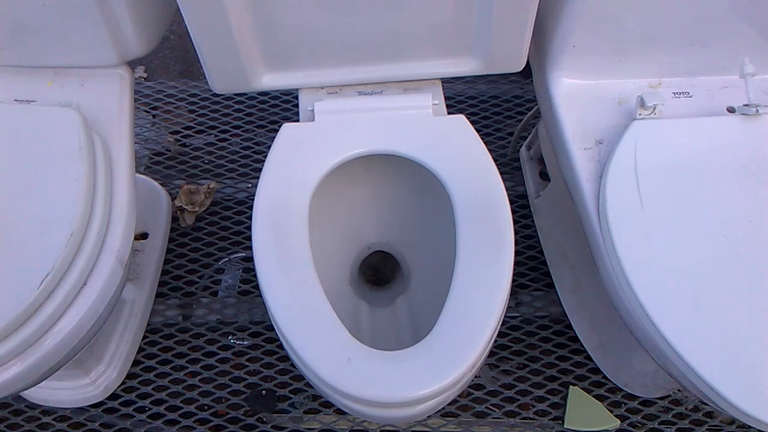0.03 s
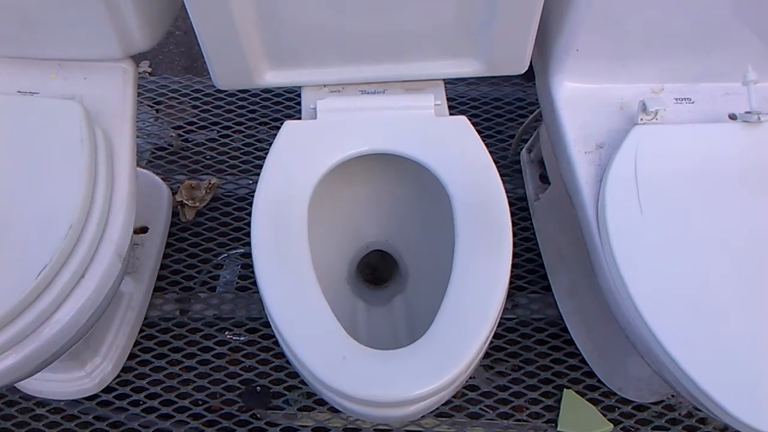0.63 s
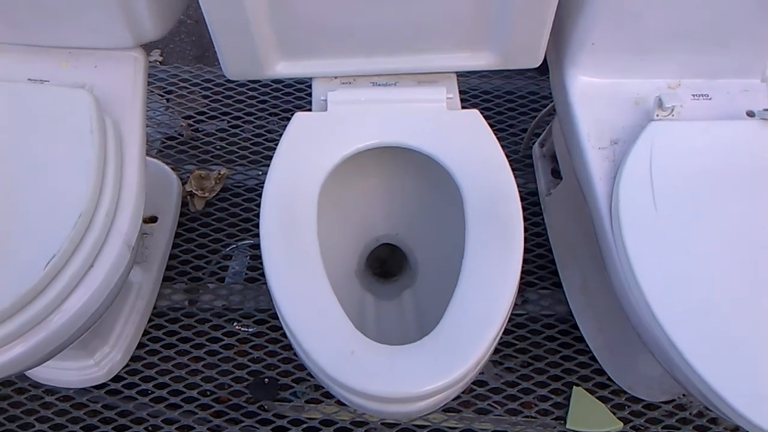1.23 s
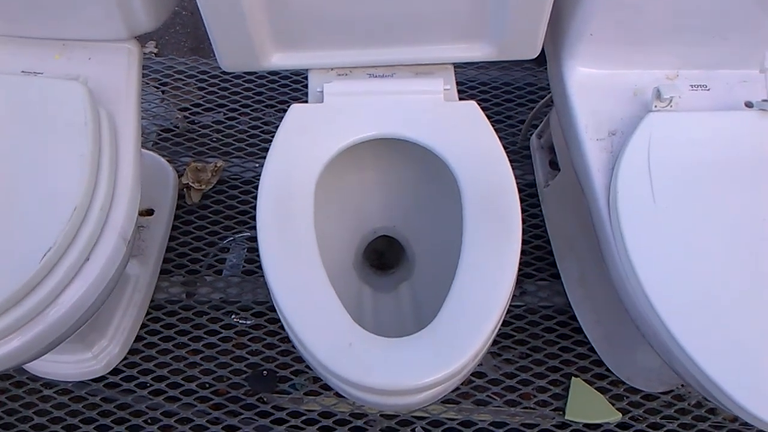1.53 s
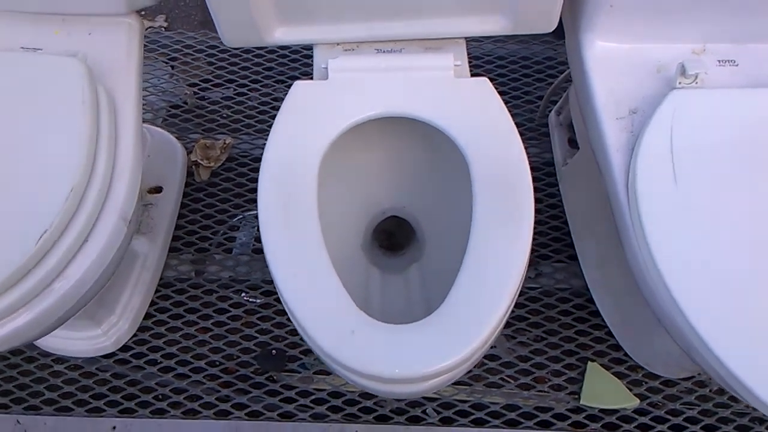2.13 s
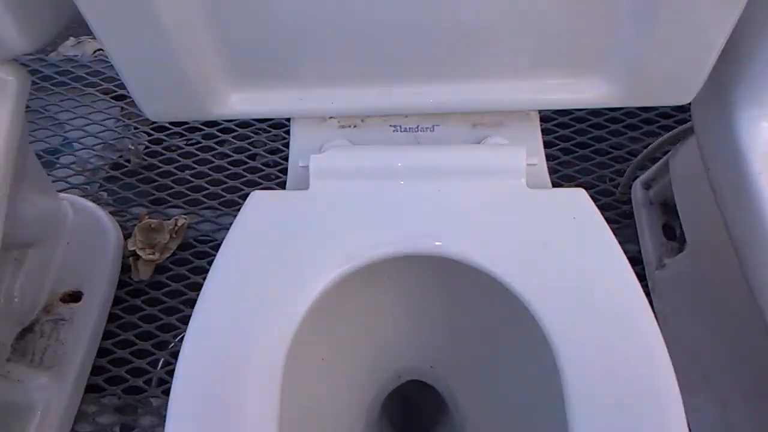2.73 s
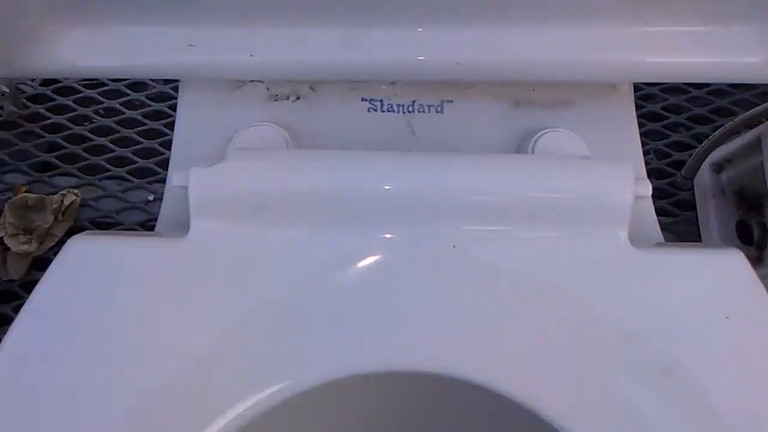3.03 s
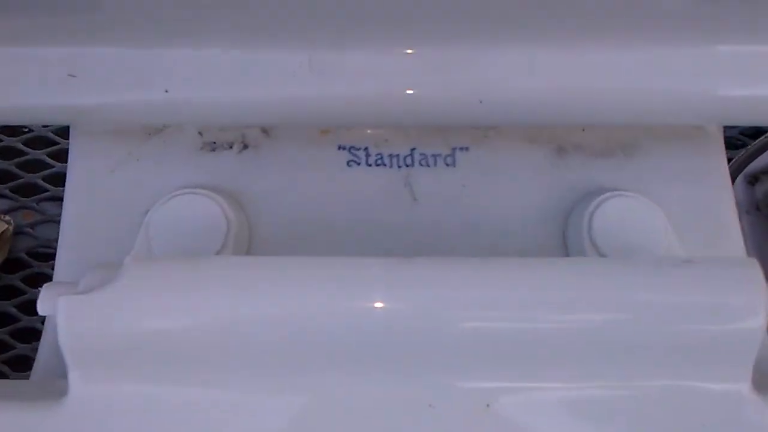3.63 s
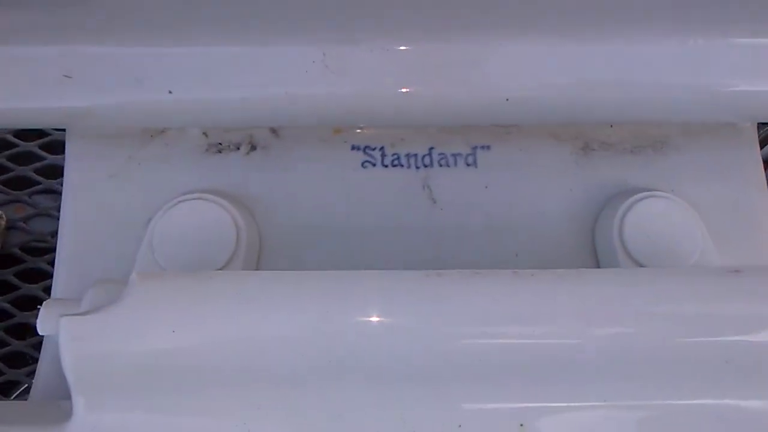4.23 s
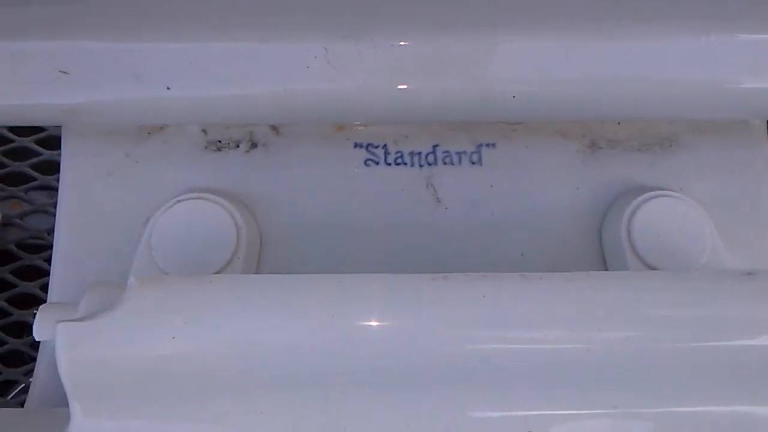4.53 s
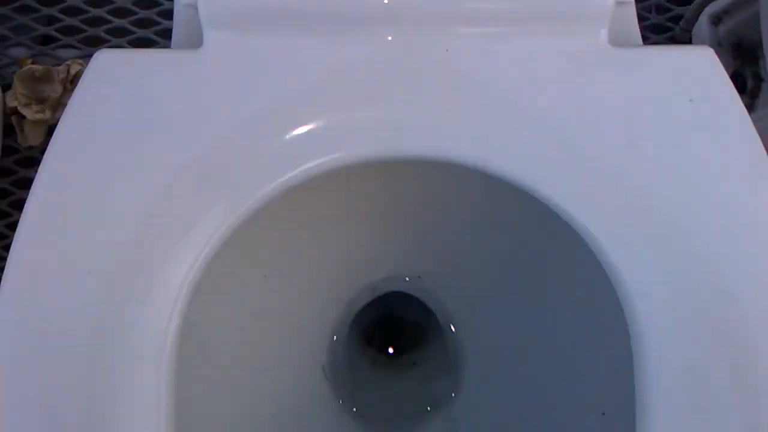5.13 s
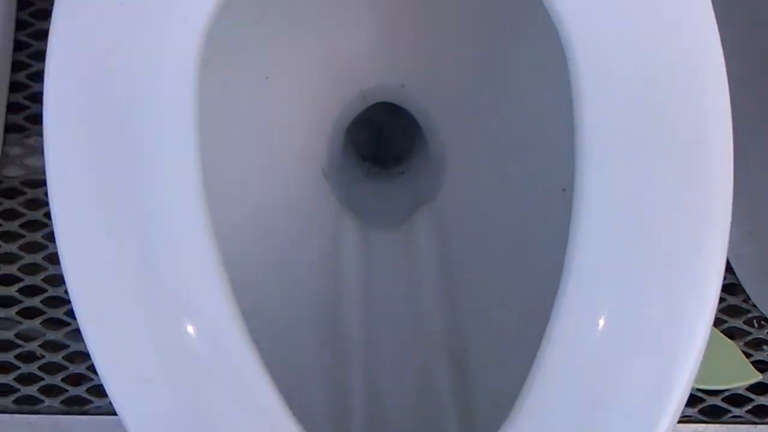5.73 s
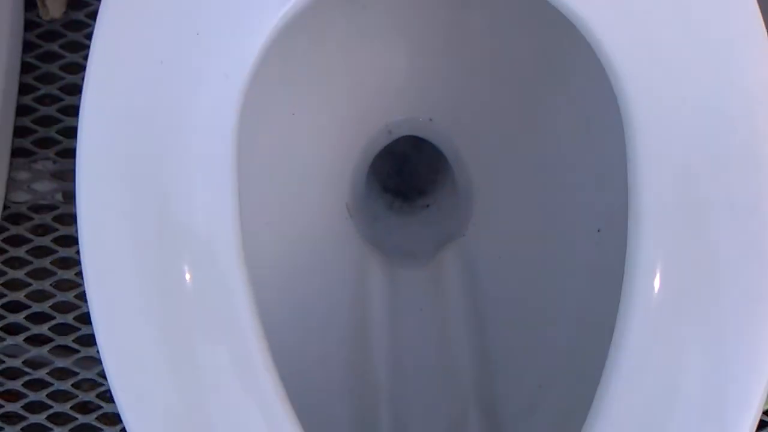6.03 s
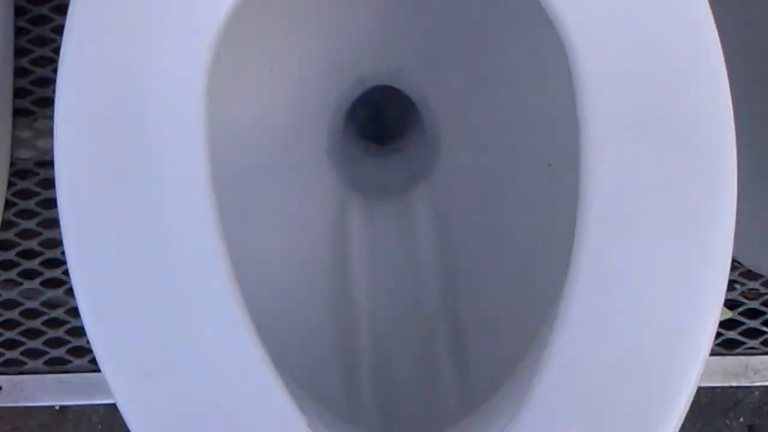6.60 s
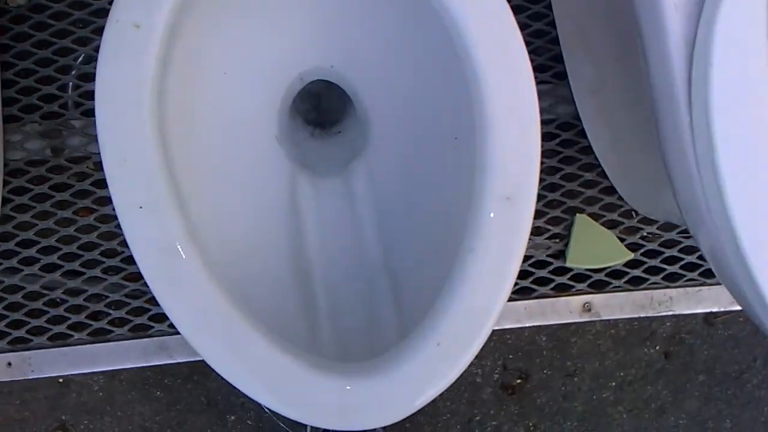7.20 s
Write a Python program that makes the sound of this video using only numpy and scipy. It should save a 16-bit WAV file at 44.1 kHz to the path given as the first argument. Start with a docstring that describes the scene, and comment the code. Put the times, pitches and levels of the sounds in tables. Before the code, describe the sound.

Outdoors in a salvage yard, a distant engine drones over low rumble and steady hiss. A heavy, hollow knock lands close by, then a small clink as the engine drops away. A short scrape and a few dry clacks follow. Fingers rub and bump the hand-held microphone, the air turns slightly hollow near a toilet bowl, and a light gust buffets the left side.

```python
"""A distant engine drones over low rumble and steady hiss, then drops away. Close by come a heavy,
hollow knock, a clink, a scrape and a few dry clacks, each a contact ringing short resonances.
A hand-held camera moves over a row of toilets in an outdoor salvage yard: the bowl and the hollow
between tank and seat colour the air as it nears the porcelain. Fingers rub and bump the housing,
one briefly seals the right microphone port, and a gust buffets the left."""
import sys
import numpy as np
from scipy import signal
from scipy.fft import rfft, irfft
from scipy.io import wavfile
from scipy.ndimage import uniform_filter1d

SR = 44100
rng = np.random.default_rng(int(sys.argv[2]) if len(sys.argv) > 2 else 0)


def master_out(mix):
    """Clip the mix to full scale and print it as 16-bit PCM to the path in sys.argv[1]."""
    frames = np.transpose(np.atleast_2d(mix))
    ceiling = np.clip(frames, -1, 1)
    pcm = np.round(ceiling * 32767).astype(np.int16)
    wavfile.write(sys.argv[1], SR, pcm)


N = 320166
TIME = np.arange(N) / SR
PORT_LAG_S = .00036  # direct sound reaches the right port this much later
CAVITY_DB_PER_HALVING = 10.5  # cavities grow with each halving of the distance from 1 m

# the camera's path: (time [s], distance to the bowl [m], distance to the hollow [m])
CAMERA_PATH = [(2.4, 0.52, 0.49), (3.2, 0.47, 0.22), (4.95, 0.5, 0.17), (5.25, 0.42, 0.27),
               (5.45, 0.29, 0.6), (6.6, 0.34, 0.78), (7.15, 0.46, 0.33)]
# dull spectrum of fingers or wind on the housing: (frequency [Hz], level [dB])
HOUSING_COLOUR = [(25, -46), (38, -7), (52, 3.5), (90, 10.5), (160, -2.5), (300, -14), (600, -29),
                  (1200, -43), (3000, -57)]


def clacks(grain_db=2.5, tail_db=-7.5, tail_t60=0.37, tail_db_per_octave=-4.5):
    """Each contact is a crowd of tiny slips ringing one resonance; nearby surfaces add a dull tail."""
    # knocks, clacks and soft rubs: (time [s], level [dB], rise [s], t60 [s], tilt [dB/octave],
    # ring [Hz], ring width [Hz], ring level [dB], left minus right [dB])
    contacts = [ (1.185, -36, .0015, 0.062, -0.5, 2500, 400, -4.5, 4),
                (1.521, -15.5, 0.011, 0.048, -4.5, 1930, 900, 1, -1.5),
                (1.535, -12, 0.0035, 0.086, 2.5, 1800, 700, -8, 3.5),
                (1.537, -13.5, 0.0034, 0.041, -6, 1070, 400, -4, 1),
                (1.551, -28, 0.002, 0.11, -4, 800, 400, 10, 4),
                (1.545, -19.5, 0.003, 0.14, -6, 420, 250, 9, 1),
                (1.567, -20.5, 0.0018, 0.105, -4, 2780, 2000, -8.5, 3),
                (1.577, -24.5, 0.0027, 0.21, -8.5, 370, 220, -5, -6),
                (1.641, -35, .003, 0.071, -12, 2010, 900, -2, 3),
                (1.976, -41, 0.0023, .12, 3, 10000, 1500, -6, 4),
                (1.9894, -31, 0.00055, 0.15, 2, 7800, 4040, -15, 4.5),
                (2.594, -39.5, 0.0021, 0.18, 8, 1800, 700, -11, -1.5),
                (2.76, -27, 0.0015, 0.056, -1, 1580, 341, 6, -12),
                (2.798, -17, 0.0046, 0.077, -1.7, 10900, 1500, -3, 2.5),
                (2.806, -24, 0.0011, 0.08, 0, 630, 220, 16, 2),
                (2.839, -16.5, 0.0064, 0.11, -1.6, 3400, 604, -12.5, 4),
                (2.99, -46.5, 0.11, .7, -2, 3500, 2000, -7, 7),
                (3.023, -26, 0.00043, 0.012, -3, 2840, 1410, -4.5, 14),
                (3.088, -30.5, 0.0032, 0.049, -2, 2880, 1500, 0, 3.5),
                (3.23, -18.5, .006, 0.075, -0.5, 4120, 2500, -8, 4),
                (3.38, -41.5, 0.0053, 0.065, 1, 4230, 700, -2, 7),
                (5.02, -49.5, 0.048, 0.26, -3, 2200, 400, -5, 4),
                (6.519, -37.5, 0.00096, 0.026, 8.5, 11150, 860, -3, 3),
                (6.57, -51, .035, .17, -7, 1050, 900, 4, 4),
                (6.84, -36, 0.00087, 0.053, -7.5, 700, 420, 5, 3), ]
    # the spectrum they share: (frequency [Hz], level [dB])
    contact_colour = [(100, -28), (330, 0.5), (700, 8.5), (1200, 2.5), (2900, 2), (3900, 3), (5300, 0.5),
                      (6800, 2.5), (8500, 4), (11500, 5.5), (14500, -6)]
    out, count = np.zeros((2, N)), 16384
    f, t = bins(count), TIME[:count]
    octaves = np.log2(np.maximum(f, 300) / 1000)
    for s, db, rise, t60, tilt_db, ring_hz, ring_width_hz, ring_db, pan_db in contacts:
        body = colour(contact_colour, f, 37) * undb(tilt_db * octaves)
        ring = np.abs(resonance(f, ring_hz, ring_width_hz)) ** 2.8
        gain = np.hypot(unit(body), undb(ring_db) * unit(ring))
        grain = uniform_filter1d(np.repeat(rng.standard_normal(count // 32), 32), size=32)
        slips = unit(undb(grain_db * grain))
        contact = field(gain, count, diffuse_hz=700, diffuse_top=0.14) * slips * swell(t, rise, t60)
        tail = field(gain * undb(tail_db_per_octave * octaves), count, diffuse_top=0.85)
        tail *= swell(t, rise, tail_t60)
        tail *= undb(tail_db) * np.sqrt(t60 / tail_t60)  # a longer contact scatters more
        clack = irfft(rfft(contact + tail) * glances(f, strength=0.43, longest_s=.003), count)
        add(out, s, clack * undb(db) * pan(pan_db))
    return out


def thuds(contact_s=.0015):
    """Heavy blows ring the low modes of a hollow body."""
    # the blows: (time [s], level [dB])
    blows = [(1.537, -23.5), (1.572, -21), (3.235, -37)]
    # the body's modes: (frequency [Hz], level [dB], t60 [s])
    modes = [(123.2, 4.5, 0.27), (254, 1.5, .3), (322, -3, 0.36), (382.4, -2.5, .25), (453, 0, 0.24),
             (518, -0.5, .22), (572, -3, 0.19), (668, -7, .17), (763, -5, .15)]
    out = np.zeros((2, N))
    t = np.maximum(TIME[:SR // 2] - np.array([[0], [PORT_LAG_S]]), 0)
    for s, db in blows:
        phases = rng.uniform(0, 2 * np.pi, len(modes))
        ring = sum(undb(mode_db) * np.sin(2 * np.pi * hz * t + phase) * swell(t, contact_s, t60)
                   for (hz, mode_db, t60), phase in zip(modes, phases))
        add(out, s, ring * undb(db))
    return out


def clinks(rise_s=0.00059):
    """Small hard parts touch and ring with one clean note."""
    # the touches: (time [s], level [dB], pitch [Hz], t60 [s], left minus right [dB])
    touches = [(1.977, -42.5, 6240, 0.062, 9), (1.99, -32.5, 2820, 0.1, 4)]
    out, t = np.zeros((2, N)), TIME[:SR // 4]
    for s, db, hz, t60, pan_db in touches:
        add(out, s, np.sin(2 * np.pi * hz * t) * swell(t, rise_s, t60) * undb(db) * pan(pan_db))
    return out


def scrape(start_s=2.7, rise_s=.065, glide_hz=(2352, 1800), slips=260, rasp_db=-31.5, hiss_db=-30.5):
    """Uneven slips each ring for a few cycles, lower as the pressure grows, over a thin hiss."""
    # friction hiss: (frequency [Hz], level [dB])
    friction_colour = [(500, 4), (1200, 2), (3200, 0), (4000, -4.5), (5200, -12), (7000, -5), (9000, 1.5),
                       (12000, 0), (14500, -10)]
    out, rings, count = np.zeros((2, N)), np.zeros((2, N)), 8192
    t, slip_t = TIME[:count], TIME[:512]
    slip_times = rng.random(slips) * t[-1]
    for s, (pitch, size, right_phase) in zip(slip_times, rng.standard_normal((slips, 3))):
        hz = np.interp(s, [0, rise_s], glide_hz) * np.exp(0.14 * pitch)
        ring = np.sin(2 * np.pi * hz * slip_t + np.array([[0], [right_phase]]))
        add(rings, s, ring * swell(slip_t, 1 / hz, t60=0.0097) * undb(4 * size))
    pressure = swell(t, rise_s, t60=.06)
    rasp = unit(rings[:, :count]) * undb(rasp_db) * pressure ** 1.5
    friction = field(colour(friction_colour, bins(count), 24), count) * undb(hiss_db) * pressure
    add(out, start_s, (rasp + friction) * pan(db=2))
    return out


def ticks(low_cut_hz=9800, ring_db=-23, ring_t60=.003):
    """Something small snaps into place: a click with a very short ring, all treble."""
    # the snaps: (time [s], level [dB], ring [Hz], left minus right [dB])
    snaps = [(2.31, -2.5, 10700, 4), (2.658, -11, 10500, -13), (6.519, -13, 13000, 3)]
    out, t = np.zeros((2, N)), TIME[:SR // 100]
    click = signal.sosfilt(signal.butter(4, low_cut_hz, "high", fs=SR, output="sos"), 1. * (t == 0))
    for s, db, hz, pan_db in snaps:
        ring = undb(ring_db) * np.sin(2 * np.pi * hz * t) * swell(t, 1 / hz, ring_t60)
        add(out, s, (click + ring) * undb(db) * pan(pan_db))
    return out


def shudders_and_bumps():
    """Dull shudders and bumps on the housing, mostly on one port at a time: the grip shifts, eddies buffet the
    left port, and the low rumble swells now and then."""
    # housing shudders: (time [s], level [dB], rise [s], t60 [s], tilt [dB/octave],
    # left minus right [dB])
    shudders = [ (1.537, -13, 0.014, 0.45, 2.5, -0.5), (1.57, -16, 0.019, 0.79, -2, -1),
                (1.83, -24, 0.008, 0.54, -3, -21), (2.043, -23, 0.015, 0.21, -9.5, -20),
                (2.203, -27, 0.052, 1, -1, -29), (2.53, -26.5, 0.042, 0.77, 2.5, -16),
                (2.892, -21.5, 0.012, 0.45, -3, 10), (3.108, -22.5, 0.031, 0.66, 0.5, 33),
                (3.231, -29.5, 0.022, 0.16, 7.5, -1), (3.85, -27, .014, 0.14, -10, 28),
                (4.2, -30, 0.018, 0.15, -3, 20), (4.27, -33, .03, 0.42, 0, 20),
                (5.076, -25.5, 0.017, 0.17, 0, 15), (5.221, -21.5, 0.015, 0.14, -15, 16),
                (5.43, -29.5, .02, 0.3, -8, 20), (5.62, -24, 0.0092, 0.2, -5.5, -17),
                (5.82, -32.5, .015, 0.2, -2, 8), (6.3, -32, 0.014, 1, -3.5, 1),
                (6.696, -34, 0.016, 0.44, -4, 2), ]
    # finger bumps: (time [s], level [dB], contact [s], left minus right [dB])
    bumps = [(1.548, -11, 0.0035, -6), (1.571, -2, 0.0021, 0), (1.582, 1.5, 0.002, 0),
             (1.989, -11.5, 0.00091, -24), (2.21, -8.5, 0.0025, -34), (2.583, 4, 0.0013, -34),
             (2.601, 1.5, 0.0027, -28), (2.619, 0.5, 0.0025, -38), (2.892, -4, .003, 20),
             (2.955, -9, .003, 16), (3.14, -12, .002, 27), (3.165, -10.5, 0.0025, 26),
             (3.183, -7, 0.0028, 26), (3.207, -5, 0.0039, 26), (5.087, -14, 0.0028, 15),
             (5.228, -26, 0.0056, 16)]
    out, count = np.zeros((2, N)), 32768
    f, t = bins(count), TIME[:count]
    for s, db, rise, t60, tilt_db, pan_db in shudders:
        gain = colour(HOUSING_COLOUR, f, 20) * undb(tilt_db * np.log2(f))
        shudder = field(gain, count, diffuse_top=0.25) * swell(t, rise, t60)
        add(out, s, shudder * undb(db) * pan(pan_db))
    for s, db, contact_s, pan_db in bumps:
        add(out, s, press(contact_s) * undb(db) * pan(pan_db) / np.sqrt(2))
    return out


def sealed_port(air, start_s=5.6075, hold_s=0.018, contact_s=0.00022, ring_hz=4080, level_db=2):
    """A fingertip shuts the yard out of the right port, pops the membrane and rings the trapped air."""
    t, right = TIME[:SR // 4], np.array([[0], [1]])
    shut = uniform_filter1d(1. * ((TIME > start_s) & (TIME < start_s + hold_s)), size=64)
    out = air * (1 - right * shut)
    pop = press(contact_s, leak_s=0.023, low_cut_hz=49)
    ring = undb(-30) * np.sin(2 * np.pi * ring_hz * t) * swell(t, contact_s, t60=0.022)
    snap = undb(-9.5) * np.exp(-t / .00002)
    add(out, start_s, right * undb(level_db) * (pop + ring + snap))
    return out


def press(contact_s, leak_s=0.018, low_cut_hz=58):
    """A pressure step on the microphone leaks away and swings through the low cut."""
    t = TIME[:SR // 4]
    step = np.sin(np.pi / 2 * np.minimum(t / contact_s, 1)) ** 2 * np.exp(-t / leak_s)
    return signal.sosfilt(signal.butter(4, low_cut_hz, "high", fs=SR, output="sos"), step)


def engine(firing_hz=85, level_db=-28.5, full_s=0.97, sag_db_per_s=5.5, roar_db=-4, rush_db=-22):
    """A distant engine comes up, drones and sags over its own roar and rush of air, then drops away."""
    # the drone's tones: (multiple of the firing rate, level [dB])
    partials = [(1, 0), (3.19, -16), (5.375, -22)]
    # broad roar: (frequency [Hz], level [dB])
    roar_colour = [(45, -5), (60, 2.5), (120, 10.5), (165, -3.5), (270, -2.5), (400, -5.5), (530, -8),
                   (760, -18), (1050, -17), (1470, -24.5), (2000, -28.5), (3500, -35), (5500, -37),
                   (7000, -46)]
    # rush of air: (frequency [Hz], level [dB])
    rush_colour = [(450, -12), (700, 0.5), (1150, 2.5), (1600, -1), (2300, -2), (3000, -11.5), (3700, -9),
                   (5200, -14), (7000, -13.5)]
    f = bins(N)
    phase = 2 * np.pi * np.cumsum(firing_hz * (1 + 0.0043 * walk(10.6))) / SR
    tones = sum(undb(db + walk(32)) * np.sin(k * phase) for k, db in partials)
    roar = reflected(field(colour(roar_colour, f, 9.8), N, diffuse_hz=915, diffuse_top=0.64))
    rush = reflected(field(colour(rush_colour, f, 24), N, diffuse_top=1))
    sag = undb(-sag_db_per_s * (TIME - full_s))
    drone = sag * (np.sqrt(2) * tones + undb(roar_db) * roar)
    running = undb(level_db + held(full_s, end_s=1.992, rise_db_per_s=9, fall_db_per_s=108))
    return (drone + undb(rush_db) * rush) * running


def gust(level_db=-41, flutter_db=3):
    """One long gust buffets the left port with light eddies."""
    eddies = field(colour(HOUSING_COLOUR, bins(N), 24), N)
    gust_db = level_db + held(full_s=4.12, end_s=5.67, rise_db_per_s=16, fall_db_per_s=44)
    return eddies * undb(gust_db + flutter_db * walk(12)) * np.array([[1], [0]])


def yard(shade_hz=2000, shade_db_per_halving=-8):
    """The open-air bed, coloured by the porcelain; near the bowl the right port loses its upper mids."""
    f = bins(N)
    near_bowl, near_hollow = -np.log2(curves(CAMERA_PATH))  # halvings of the distance from 1 m
    rumble, wash, hiss = open_air(f, near_bowl, near_hollow)
    hollow, bowl, hollow_top = porcelain(f, near_bowl, near_hollow)
    mids = restless(reflected(wash) + hollow_top + bowl, flicker_db=1.8, rate_hz=11) + hollow
    upper = irfft(rfft(mids[1]) * f ** 4 / (f ** 4 + shade_hz ** 4), N)
    mids[1] += upper * (undb(shade_db_per_halving * near_bowl) - 1)
    return rumble + notched(mids + restless(hiss, flicker_db=.9, rate_hz=10), f)


def open_air(f, near_bowl, near_hollow, rumble_db=-44, wash_db=-62, gathered_db=-70.5):
    """Distant rumble, a midrange wash that the bowl gathers, and high hiss."""
    # spectra of the three layers: (frequency [Hz], level [dB])
    rumble_colour = [(25, -51), (38, -6), (55, 4), (100, 0), (125, 1.5), (150, -12), (190, -3), (240, -18),
                     (280, -12), (370, -26), (465, -21), (700, -25.5)]
    wash_colour = [(290, -51), (500, -1), (579, -4), (727, 1.5), (1180, -5.5), (1590, -6.5), (1820, -8.5),
                   (2230, -6), (2930, -7.5), (4800, -13), (7500, -19.5), (9750, -79), (16500, -120)]
    hiss_colour = [(5500, -17.5), (7500, -1), (9000, 0), (11000, 6), (13000, -6), (15000, -1.5)]
    # the hiss's fader: (time [s], left [dB], right [dB])
    hiss_levels = [(0.8, -47, -53), (2.2, -46.5, -52.5), (2.9, -46.5, -49), (4.9, -48.5, -52),
                   (5.15, -51, -52), (6.63, -51, -53), (6.95, -60.5, -62)]
    rumble = field(colour(rumble_colour, f, 13.6), N, diffuse_hz=150, diffuse_top=0.027)
    rumble *= undb(rumble_db + 2 * near_hollow + 1.96 * walk(6))
    gathered = undb(gathered_db + CAVITY_DB_PER_HALVING * near_bowl)
    wash_gain = np.hypot(undb(wash_db), gathered) * undb(1.3 * walk(9))
    wash = field(colour(wash_colour, f, 24), N, diffuse_hz=885, diffuse_top=1) * wash_gain
    hiss = field(colour(hiss_colour, f, 16), N, diffuse_top=0.73) * undb(curves(hiss_levels))
    return rumble, wash, hiss


def porcelain(f, near_bowl, near_hollow, hollow_db=-68.5, bowl_db=-73.5):
    """The bowl and the hollow's low modes swell as the camera nears; its top modes come and go."""
    # modes of the hollow (low, top) and the bowl: (frequency [Hz], width before spread [Hz], level [dB])
    low_modes = [(178, 18, -10), (266.7, 4.7, 0.5), (370, 24, 1.5), (466, 50, -10.5), (722, 47, -13.5),
                 (900, 105, -22.5)]
    top_modes = [(1850, 120, 3), (2184, 63, -5), (2500, 60, -4), (2890, 190, -3.5)]
    bowl_modes = [(462, 22, 10), (655, 51, 2.5), (900, 150, -2), (1387, 75, 6), (1754, 82, 3),
                  (2510, 150, -14), (3010, 200, -4.5), (4600, 130, -2)]
    # the top modes' fader: (time [s], level [dB])
    top_levels = [(2.5, -75), (3.1, -59), (3.7, -67), (4.1, -67), (4.3, -59.5), (4.5, -66), (4.65, -57.5),
                  (5.05, -58.5), (5.3, -64)]
    hollow = cavity(low_modes, f, spread=1.87)
    hollow *= undb(hollow_db + CAVITY_DB_PER_HALVING * near_hollow + walk(9.2))
    bowl = cavity(bowl_modes, f, spread=1)
    bowl *= undb(bowl_db + CAVITY_DB_PER_HALVING * near_bowl + 1.5 * walk(7.9))
    hollow_top = cavity(top_modes, f, spread=1.37) * undb(curves(top_levels)[0])
    return hollow, bowl, hollow_top


def cavity(modes, f, spread):
    """Outside noise rings in an open cavity; the peaks wander a little as the camera sways."""
    gain = sum(undb(db) * np.abs(resonance(f, hz, spread * width)) ** 3 for hz, width, db in modes)
    warped_time = np.cumsum(1 + .014 * walk(3)) / SR
    ringing = field(gain, N, diffuse_hz=1610, diffuse_top=0.27)
    return np.array([np.interp(warped_time, TIME, port, period=N / SR) for port in ringing])


def reflected(air, strength=0.25, dull_hz=1200):
    """The curved porcelain sends back the lows; the comb of this echo shifts as the camera moves."""
    delay_s = 2 * curves(CAMERA_PATH)[0] / 343
    lows = signal.sosfilt(signal.butter(2, dull_hz, fs=SR, output="sos"), air)
    return air + strength * np.array([np.interp(TIME - delay_s, TIME, port) for port in lows])


def notched(air, f, reach_m=0.12):
    """The porcelain's echo cancels bands of the air, most deeply close to the hollow."""
    # cancelled bands: (frequency [Hz], width [Hz], full depth [dB])
    notches = [(1200, 230, -9), (5000, 2300, -3.5)]
    gain = undb(sum(db * np.abs(resonance(f, hz, width)) ** 2 for hz, width, db in notches))
    close = np.minimum(reach_m / curves(CAMERA_PATH)[1], 1) ** 3
    return air + close * (irfft(rfft(air) * gain, N) - air)


def glances(f, strength, longest_s, count=5):
    """Early reflections off the porcelain, different at each port, ripple the spectrum."""
    delays = rng.uniform(0.00019, longest_s, (count, 2, 1))
    echoes = np.exp(-2j * np.pi * f * delays).sum(axis=0)
    return (1 + strength * echoes) / np.sqrt(1 + count * strength ** 2)


def restless(air, flicker_db, rate_hz, count=9):
    """Overlapping bands each swell and sink on their own."""
    place = np.interp(np.log(bins(N)), np.log([500, 14000]), [0, count - 1])
    spectrum = rfft(air)
    bands = (irfft(spectrum * np.maximum(1 - np.abs(place - k), 0), N) for k in range(count))
    return sum(band * undb(flicker_db * walk(rate_hz)) for band in bands)


def field(gain, count, diffuse_hz=900, diffuse_top=0.86):
    """Stereo noise: a direct part that arrives left first, and a diffuse part that grows with pitch."""
    f = bins(count)
    direct, *diffuse = rfft(rng.standard_normal((3, count)))
    share = np.clip(diffuse_top * f / (f + diffuse_hz), 0, 1)
    lag = np.exp(-2j * np.pi * f * np.array([[0], [PORT_LAG_S]]))
    spectrum = np.sqrt(1 - share) * direct * lag + np.sqrt(share) * np.array(diffuse)
    return unit(irfft(gain * spectrum, count))


def swell(t, rise, t60):
    """Contact builds up, then dies away."""
    return np.minimum(t / rise, 1) * np.exp(-np.log(1000) * np.maximum(t - rise, 0) / t60)


def held(full_s, end_s, rise_db_per_s, fall_db_per_s):
    """Attack, hold and release, in dB relative to the held level."""
    return -rise_db_per_s * np.maximum(full_s - TIME, 0) - fall_db_per_s * np.maximum(TIME - end_s, 0)


def walk(rate_hz):
    """Random drift with a spread near 1."""
    knots = rng.standard_normal(512)
    return np.interp(TIME * rate_hz, np.arange(len(knots)), knots)


def curves(rows):
    """Each column of a table, joined by straight lines in time."""
    s, *columns = np.transpose(rows)
    return [np.interp(TIME, s, c) for c in columns]


def colour(points, f, skirt_db=0):
    """EQ curve through (Hz, dB) points; beyond the ends it falls by skirt_db an octave."""
    hz, db = np.transpose(points)
    outside = np.abs(np.log2(f / np.clip(f, hz[0], hz[-1])))
    return undb(np.interp(np.log(f), np.log(hz), db) - skirt_db * outside)


def resonance(f, hz, width):
    """Response of one resonance, 1 at its centre."""
    return 1 / (1 + 1j * (f / hz - hz / f) * hz / width)


def bins(count):
    """Frequencies of a spectrum of count samples."""
    return np.maximum(np.arange(count // 2 + 1) * SR / count, 1)


def pan(db):
    """Left and right gains of constant power."""
    return unit(undb(np.array([[db], [-db]]) / 2))


def undb(db):
    """Decibels to gain."""
    return 10 ** (np.asarray(db) / 20)


def unit(x):
    """Scale to rms 1."""
    return x / np.sqrt(np.mean(x ** 2))


def add(out, s, sound):
    """Mix a sound in at time s."""
    i = int(s * SR)
    out[:, i:i + sound.shape[-1]] += sound[..., :N - i]


def scene():
    """Airborne sound at the two ports, plus fingers and wind on the housing."""
    airborne = yard() + engine() + clacks() + thuds() + clinks() + ticks() + scrape()
    return sealed_port(airborne) + shudders_and_bumps() + gust()


def record(dry):
    """Each port has its own treble peaks; the input opens after a moment and fades up; the top is cut."""
    # response of each microphone port: (frequency [Hz], level [dB])
    left_port = [(1000, -2.5), (6500, 2.5), (8300, -2.5), (9500, 3.5), (10900, -1.5), (12500, 2.5),
                 (14000, -1), (15000, -58)]
    right_port = [(1000, -3.5), (6500, 4.5), (7600, 2), (8900, 8.5), (10000, 0.5), (11500, -9),
                  (14000, -1.5), (15000, -32)]
    start_s, fade_s, fade_db, top_hz = 0.6283, 0.17, -13.5, 14800
    f = bins(N)
    heard = irfft(rfft(dry) * np.array([colour(left_port, f), colour(right_port, f)]), N)
    opening = (TIME > start_s) * undb(fade_db * np.clip(1 - (TIME - start_s) / fade_s, 0, 1))
    return signal.sosfilt(signal.ellip(8, .2, 70, top_hz, fs=SR, output="sos"), heard * opening)


dry = scene()
out = record(dry)
master_out(out)
```